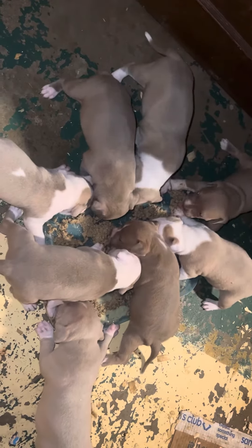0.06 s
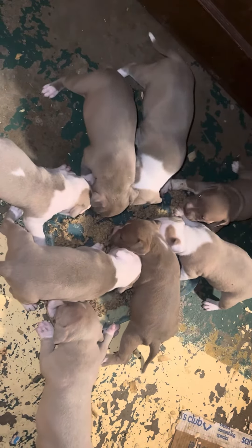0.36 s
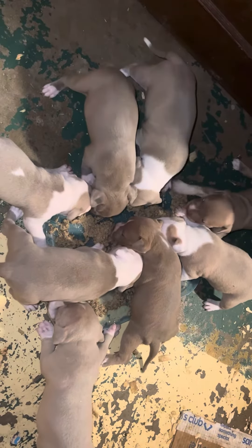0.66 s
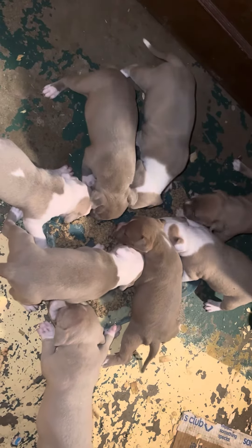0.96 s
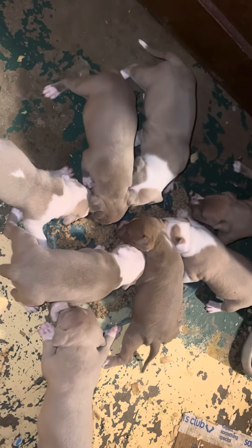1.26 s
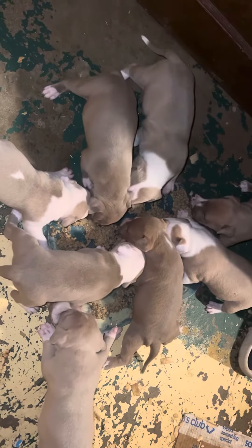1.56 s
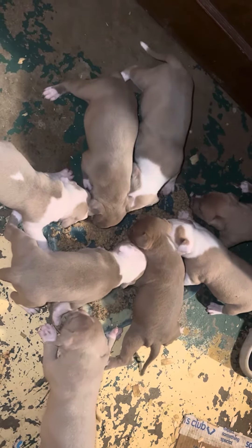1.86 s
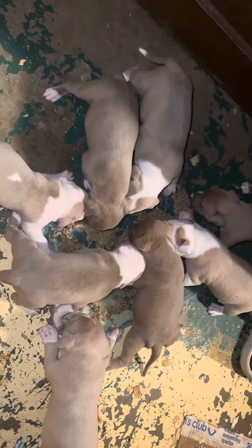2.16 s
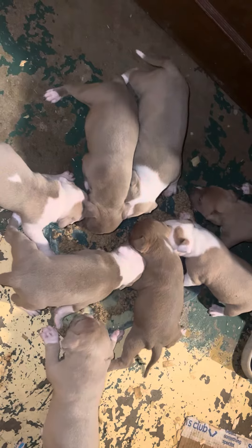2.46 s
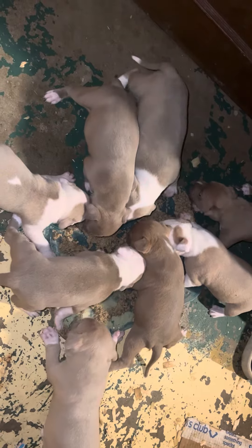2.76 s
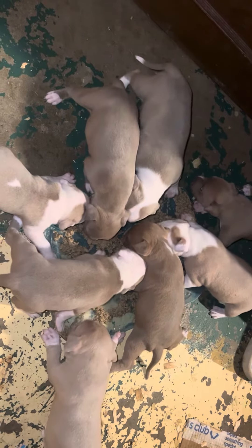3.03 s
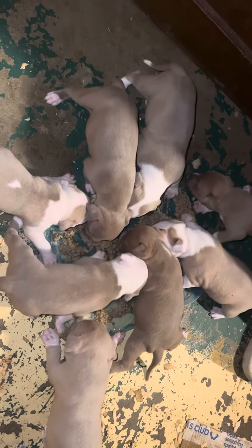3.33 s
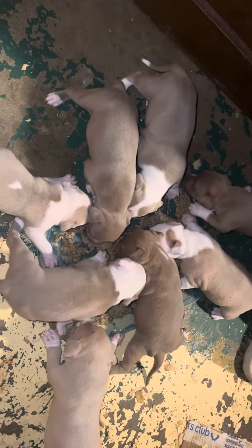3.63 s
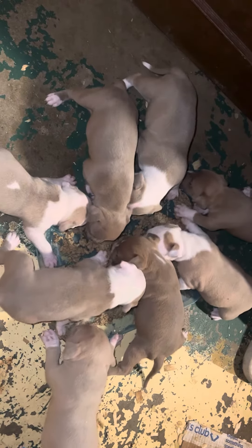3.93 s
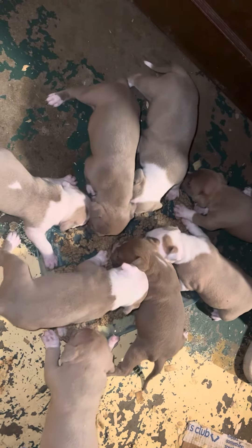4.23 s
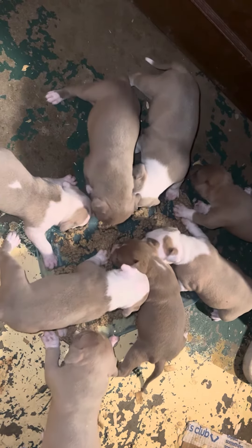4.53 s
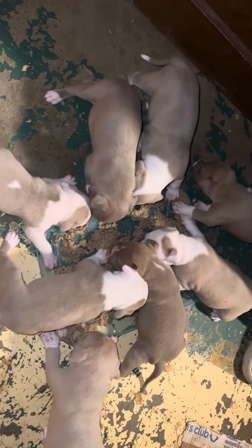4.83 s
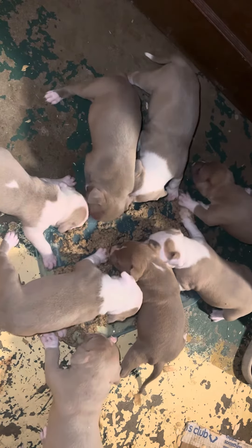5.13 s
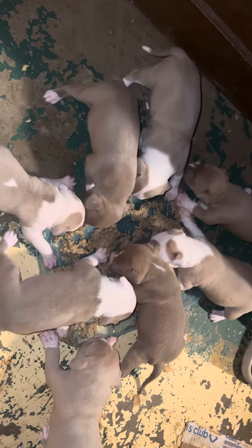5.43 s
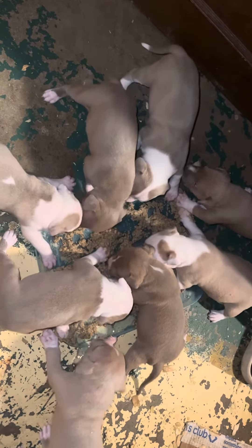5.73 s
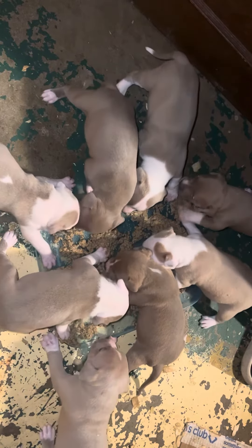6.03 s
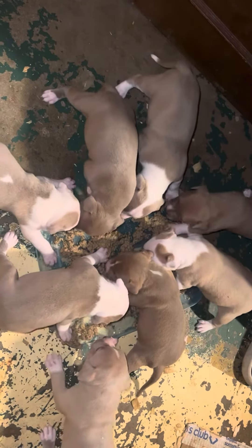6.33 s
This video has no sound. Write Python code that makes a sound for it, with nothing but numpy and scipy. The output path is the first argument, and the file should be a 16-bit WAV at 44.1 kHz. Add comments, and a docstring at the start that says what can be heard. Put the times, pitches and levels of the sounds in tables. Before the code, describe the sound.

A litter of puppies eats wet mush off the floor of a small room, heard from just above. Their tongues lap in dull pops, a fine sticky crackle and irregular wet smacks, with soft low bumps as they jostle. Early on, something hard is knocked once and rings briefly. Paws and muzzles then scuff the floor, and the feeding goes on, a little quieter toward the end.

```python
"""A small room, the microphone above a litter of puppies eating wet mush off a painted floor.
From the start, over faint room air, tongues lap with dull pops and a fine sticky crackle, wet films
tear into smacks, and jostling bodies give soft low bumps. At 1.2 s something hard is knocked once and
rings briefly. From 2.3 s paws and muzzles scuff the floor, hardest near 3.2 s. The loudest smack
comes at 4.6 s, and the feeding carries on a little more quietly to the end."""
import sys
import numpy as np
from scipy import signal
from scipy.fft import rfft, irfft, next_fast_len
from scipy.io import wavfile
from scipy.ndimage import map_coordinates

SR = 44100
rng = np.random.default_rng(int(sys.argv[2]) if len(sys.argv) > 2 else 0)


def master(y):
    """Save y as 16-bit WAV."""
    cut = np.clip(np.atleast_2d(y).T, -1, 1)
    pcm = np.round(cut * 32767)  # scale
    wavfile.write(sys.argv[1], SR, pcm.astype(np.int16))


N = 281799
TOP_HZ = 16100  # upper edge of the microphone's band


def amp(db):
    """Decibels to gain."""
    return 10 ** (np.asarray(db) / 20)


def unit(x):
    """Scale to rms 1."""
    return x / np.sqrt(np.mean(x ** 2) + 1e-20)


def along(points, hz):
    """Read (frequency [Hz], value) points on a log frequency axis."""
    point_hz, values = np.transpose(points)
    return np.interp(np.log(hz + 1), np.log(point_hz + 1), values)


def add(track, s, x):
    """Mix x into the track from time s on."""
    start = max(round(s * SR), 0)
    part = track[start:start + len(x)]
    part += x[:len(part)]


def filtered(x, response):
    """Filter x by the gain response(hz)."""
    size = next_fast_len(len(x) + 4096, True)
    return irfft(rfft(x, size) * response(np.fft.rfftfreq(size, 1 / SR)), size)[:len(x)]


def coloured(x, spectrum):
    """Filter x by (frequency [Hz], level [dB]) points, then scale to rms 1."""
    return unit(filtered(x, lambda hz: amp(along(spectrum, hz))))


def impulse(db_of, size=2048):
    """The minimum-phase click with spectral shape db_of(hz) and peak 1."""
    cepstrum = irfft(np.log(amp(db_of(np.fft.rfftfreq(size, 1 / SR))) + 1e-6))
    cepstrum[1:size // 2] *= 2
    cepstrum[size // 2 + 1:] = 0
    click = irfft(np.exp(rfft(cepstrum)))
    return click / np.abs(click).max()


def bell(hz, centre, width):
    """The power curve of one resonance."""
    return 1 / (1 + (2 * (hz - centre) / width) ** 2)


def stroke(length_s, rise_s, fall_s):
    """Envelope of a push that swells, lasts and dies away."""
    t = np.arange(int((length_s + 8 * fall_s) * SR)) / SR
    return (1 - np.exp(-t / rise_s)) * np.exp(-np.maximum(t - length_s, 0) / fall_s)


def grains(per_s, centre_hz, octaves, cycles, scatter_db, count=12000, size=160):
    """Tiny bursts or slips at random times: damped sines of random pitch and strength."""
    wait, pitch, strength = rng.random((count, 3)).T
    start = np.cumsum(-np.log(1 - wait)) / per_s
    heard = start < N / SR
    hz = np.minimum(centre_hz * 2 ** (octaves * (2 * pitch[heard, None] - 1)), TOP_HZ)
    gain = amp(scatter_db * np.minimum(-np.log(1 - strength[heard, None]), 4))
    turns = hz * np.arange(size) / SR
    waves = gain * np.sin(2 * np.pi * turns) * np.exp(-turns / cycles) * np.linspace(1, 0, size)
    where = (start[heard, None] * SR).astype(int) + np.arange(size)
    return unit(np.bincount(where.ravel(), waves.ravel(), N)[:N])


# Room tone at the microphone: (frequency [Hz], relative level [dB])
AIR_SPECTRUM = [(30, -39), (75, 3), (110, 1.5), (170, -0.5), (240, 7), (500, -9.5), (1500, -7.5),
                (5000, -16), (16000, -26)]
def air(level_db=-63.0):
    """The small room's air: faint steady noise, mostly low."""
    return amp(level_db) * coloured(rng.standard_normal(N), AIR_SPECTRUM)


# How busily the litter laps below the microphone: (time [s], relative level [dB])
FEEDING_EFFORT = [(0.0, -54), (1.03, -53.5), (1.21, -52.5), (1.41, -54.5), (2.28, -54), (2.46, -57),
                  (3.1, -53), (3.33, -51), (3.86, -54), (4.24, -53), (4.36, -55.5), (5.11, -55),
                  (5.44, -59.5), (5.68, -54.5), (6.32, -58), (6.39, -57.5)]
def effort_db():
    """The litter's lapping swells and eases: its level in dB at each sample."""
    return np.interp(np.arange(N) / SR, *np.transpose(FEEDING_EFFORT))


def licks(depth_db, per_s):
    """A gain that wavers at random as single licks come and go."""
    knots = rng.standard_normal(int(N * per_s / SR) + 4)
    return amp(depth_db * map_coordinates(knots, [np.arange(N) * per_s / SR]))


# Dull pops in the mush on the floor: (frequency [Hz], relative level [dB])
POP_SPECTRUM = [(100, -8.5), (240, -8.5), (600, -3), (1100, 5.5), (2200, 8), (3500, -14), (6000, -34)]
# Sticky crackle of the mush: (frequency [Hz], relative level [dB])
CRACKLE_SPECTRUM = [(800, -4.5), (2500, -1.5), (6000, -0.5), (7500, -3), (10300, -1), (12000, -7.5),
                    (16000, -9)]
def feeding(lap_db=-3.5, crackle_db=-6.0):
    """Many tongues work the mush: films and bubbles burst in dull pops and a finer sticky crackle."""
    pops = grains(per_s=1200, centre_hz=1200, octaves=2, cycles=1.6, scatter_db=3, size=400)
    crackle = grains(per_s=1500, centre_hz=6200, octaves=1.35, cycles=3, scatter_db=3.6, size=240)
    lapping = amp(lap_db) * coloured(pops, POP_SPECTRUM) * licks(depth_db=1.5, per_s=20)
    sticky = amp(crackle_db) * coloured(crackle, CRACKLE_SPECTRUM) * licks(depth_db=2.5, per_s=36)
    return amp(effort_db()) * (lapping + sticky)


# One snap of a wet film, heard from above: (frequency [Hz], relative level [dB])
SNAP_SPECTRUM = [(150, -33), (600, -15), (1200, 0), (3200, -2), (6000, -2.5), (7500, -7), (10500, -6),
                 (12500, -14), (16000, -18)]
def smack(mouth_hz, treble_db, mouth_db=12, q=3.4, cavity_db=8, cavity_q=6, tear_s=0.00126, size=512):
    """A wet film tears in a quick run of snaps that ring the mouth and three small cavities."""
    cavities_hz = 2200 * 5 ** rng.random(3)

    def ring_db(hz):
        mouth = mouth_db * bell(hz, mouth_hz, mouth_hz / q)
        cavities = [cavity_db * bell(hz, centre, centre / cavity_q) for centre in cavities_hz]
        tilt = (treble_db + 8.0) * np.log10(1 + (hz / 5000) ** 3)  # a slower tear loses the top first
        return along(SNAP_SPECTRUM, hz) + np.max([mouth] + cavities, axis=0) + tilt

    age = np.arange(size) / SR / tear_s
    snaps = rng.standard_normal(size) * (age + .5) * np.exp(-age)  # the tear speeds up, then runs out
    snaps[round(tear_s * SR / 2)] = 1
    wave = signal.fftconvolve(impulse(ring_db), snaps)
    return wave / np.linalg.norm(wave)


def quiet_smacks(pups=4, laps_per_s=3.4, uneven_laps=0.4, boost_db=15.5, scatter_db=2):
    """Each pup laps in its own loose rhythm; a half-closed mouth gives a pitched pop."""
    out, busy_db = np.zeros(N), effort_db()
    for _ in range(pups):
        phase = rng.random()
        for lap, (late, strength, opening, wetness) in enumerate(rng.standard_normal((40, 4))):
            s = (lap + phase + uneven_laps * late) / laps_per_s
            if 0 <= s < N / SR:
                db = busy_db[int(s * SR)] + boost_db + scatter_db * strength
                pop = smack(mouth_hz=2510 * 2 ** (0.67 * opening), treble_db=-21.5 + 9 * wetness,
                            mouth_db=15.5, q=2.8, tear_s=0.0016)
                add(out, s, amp(db) * pop)
    return out


# Smacks of the mouths nearest the microphone; a treble of -8 leaves the top untilted:
# (time [s], relative level [dB], mouth resonance [Hz], treble [dB])
NEAR_SMACKS = [(0.018, -33, 6440, -10), (0.1807, -30, 4080, -15), (0.1877, -28, 2290, -17),
               (0.4015, -31.5, 1710, -15), (0.461, -34.5, 3660, -8), (0.4942, -32, 2980, -11),
               (0.5401, -26.5, 2800, -10), (0.5931, -32.5, 1410, -19), (0.733, -33.5, 1460, -23),
               (0.983, -25.5, 6450, -4.5), (1.047, -32, 3160, -20), (1.3132, -24, 6340, -6.5),
               (1.3496, -29.5, 3680, -23), (1.605, -28, 1740, -90), (1.7309, -27, 5940, -12),
               (1.8338, -29.5, 1670, -6), (2.1162, -30, 2360, -10.5), (2.276, -31.5, 1500, -22),
               (2.352, -27.5, 6000, -14), (2.4636, -32, 2730, -49), (2.6173, -31, 1440, -17),
               (2.663, -29.5, 2360, -6), (2.756, -34.5, 4970, -5), (2.7823, -35, 2880, -18),
               (2.8118, -23, 3080, -19.5), (2.836, -27.5, 1260, -56), (3.0655, -31.5, 5630, -12),
               (3.4633, -36.5, 2720, -18), (3.62, -30.5, 1290, -28), (4.3277, -30.5, 1780, -9),
               (4.5338, -27.5, 3370, -5.5), (4.579, -20, 3530, -17.5), (4.9329, -27.5, 3340, -9),
               (4.9444, -28, 1950, -12), (5.5249, -34.5, 3470, -18), (5.5423, -32.5, 1540, -60),
               (5.8566, -35, 2840, -38), (5.934, -35.5, 2950, -24), (6.0399, -36.5, 1590, -6),
               (6.2024, -35, 2800, -15), (6.346, -36, 5160, -3)]
def smacks(gain_db=13, thread_db=-13, thread_s=0.013, threads=2):
    """The nearest mouths smack among the quiet ones; sticky threads snap faintly just after."""
    out = quiet_smacks()
    for s, db, mouth_hz, treble_db in NEAR_SMACKS:
        add(out, s, amp(db) * smack(mouth_hz, treble_db))
        for delay, shift in rng.random((threads, 2)):
            thread = smack(mouth_hz * 2 ** (shift - .5), treble_db)
            add(out, s + thread_s * (2 * delay + .2), amp(db + thread_db) * thread)
    return amp(gain_db) * out


# Bodies bumping down at floor level: (time [s], relative level [dB], centre frequency [Hz])
BODY_BUMPS = [(0.022, -53, 110), (0.366, -50.5, 90), (0.925, -56, 82), (1.1, -52.5, 113), (1.75, -60, 170),
              (2.565, -63, 90), (3.199, -54, 90), (3.489, -55, 70), (4.564, -53, 62)]
def bumps(gain_db=-1):
    """Soft bodies jostle with low, toneless thuds."""
    out = np.zeros(N)
    push = stroke(length_s=0.056, rise_s=0.0049, fall_s=0.018)
    for s, db, centre_hz in BODY_BUMPS:
        thud = filtered(rng.standard_normal(SR // 2), lambda hz: bell(hz, centre_hz, width=centre_hz))
        add(out, s, amp(db + gain_db) * unit(thud[:len(push)]) * push)
    return out


# A hard blow in the room and its rebound: (time [s], direct peak level [dB])
KNOCK_HITS = [(1.2185, -4), (1.2241, -22)]
# Resonances of the knocked object: (frequency [Hz], width [Hz], relative strength [dB])
KNOCK_MODES = [(665, 300, 0), (930, 93, -4), (1993, 85, 1.5), (2430, 73, 0), (3040, 120, -8),
               (4630, 160, -8)]
# The click of the contact: (frequency [Hz], relative level [dB])
CONTACT_SPECTRUM = [(60, -30), (170, -11), (400, -10), (750, -1.5), (1900, 2), (3000, -5.5), (4500, -14.5),
                    (7000, -17.5), (10000, -19.5), (16000, -35)]
def knock(ring_db=6):
    """A hard contact gives a sharp click and a brief ring."""
    out = np.zeros(N)
    ring = lambda hz: sum(amp(db) * bell(hz, centre, width) for centre, width, db in KNOCK_MODES)
    click = impulse(lambda hz: along(CONTACT_SPECTRUM, hz) + ring_db * ring(hz), size=8192)
    for s, db in KNOCK_HITS:
        add(out, s, amp(db) * click)
    return out


# Scuffs on the floor below the microphone:
# (time [s], nominal length [s], relative level [dB], body resonance [Hz], roll-off [Hz])
FLOOR_SCUFFS = [(2.262, 0.069, -43.5, 605, 1600), (2.937, 0.025, -43, 970, 2500),
                (3.113, 0.067, -46, 756, 2000), (3.164, 0.076, -32, 480, 2850),
                (3.235, 0.047, -30, 706, 6130), (3.36, 0.29, -51.5, 750, 5000),
                (3.915, 0.054, -42, 605, 1460), (4.051, 0.027, -40, 950, 4020),
                (4.134, 0.045, -38.5, 1060, 5600), (4.224, 0.094, -49.5, 480, 1300),
                (4.933, 0.045, -34, 1030, 7000), (5.173, 0.081, -45, 1250, 4500),
                (5.38, 0.042, -48, 1960, 7000), (5.611, 0.035, -45, 1510, 4500),
                (5.721, 0.061, -41.5, 1810, 5000), (6.013, 0.052, -50.5, 700, 4000)]
# Rubbing on the painted floor: (frequency [Hz], relative level [dB])
RUB_SPECTRUM = [(50, -18), (200, -1.5), (420, 0.5), (800, 0.5), (2000, 1), (3800, 1), (5500, 1),
                (10500, -6), (12500, -14), (16000, -20)]
def scuffs(gain_db=-2, hold_share=0.66, body_db=7.5):
    """Paws and muzzles slide in dense slips; each scuff has its own body resonance and roll-off."""
    slips = grains(per_s=1700, centre_hz=2580, octaves=2.3, cycles=0.44, scatter_db=3.5)
    rub = coloured(.5 * slips + rng.standard_normal(N), RUB_SPECTRUM)
    out = np.zeros(N)
    for s, length_s, db, body_hz, dull_hz in FLOOR_SCUFFS:
        push = stroke(hold_share * length_s, rise_s=0.0071, fall_s=0.023)
        body = lambda hz: amp(body_db * bell(hz, body_hz, width=2.5 * body_hz))
        band = lambda hz: hz / np.hypot(hz, body_hz / 2) / np.hypot(hz, dull_hz)
        contact = rub[round(s * SR):][:len(push)]
        slide = unit(filtered(contact, lambda hz: body(hz) * band(hz)))
        add(out, s, amp(db + gain_db) * slide * push[:len(slide)])
    return out


# The tail off the small room's walls: (frequency [Hz], time to fall 60 dB [s])
WALL_DECAY = [(150, 0.51), (800, 0.29), (3500, 0.2), (8000, 0.21), (15000, 0.18)]
def room(x, tail_db, early_db, early_t60_s=0.048, block=8192):
    """Floor and bodies scatter the sound at once, then the walls add a short tail."""
    out = x.copy()
    for start in range(0, N, block):  # a fresh random tail each block, so no fixed colouring
        hz, t, noise = signal.stft(rng.standard_normal(SR // 3), SR, nperseg=256)
        decay = amp(-60 * t / along(WALL_DECAY, hz)[:, None])
        tail = signal.istft(noise * decay, SR, nperseg=256)[1]
        early = rng.standard_normal(len(tail)) * amp(-60 * np.arange(len(tail)) / SR / early_t60_s)
        tail *= amp(tail_db) / np.linalg.norm(tail)
        early *= amp(early_db) / np.linalg.norm(early)
        add(out, start / SR, signal.fftconvolve(x[start:start + block], early + tail))
    return out


def scene():
    """From above the litter: mouths, scuffs and knock carry the room; the bumps arrive dry."""
    mouths = room(smacks(), tail_db=-6.5, early_db=-8.0)
    mush = room(feeding(), tail_db=-4, early_db=-6.5)
    jostling = room(scuffs(), tail_db=-5, early_db=-13) + bumps()
    blow = room(knock(), tail_db=-2.0, early_db=-3.0)
    return (mouths + mush + jostling + blow + air())[None]


def record(dry, bass_cut_hz=52):
    """A mono phone microphone overhead thins the deep bass and keeps nothing above its band."""
    bass_cut = signal.butter(4, bass_cut_hz, "highpass", fs=SR, output="sos")
    thinned = signal.sosfilt(bass_cut, dry[0])
    return filtered(thinned, lambda hz: 1 / (1 + (hz / TOP_HZ) ** 160))[None]


dry = scene()
out = record(dry)
master(out)
```